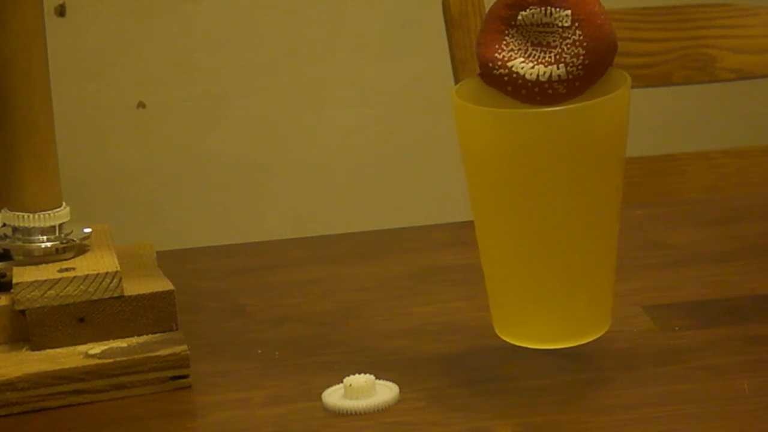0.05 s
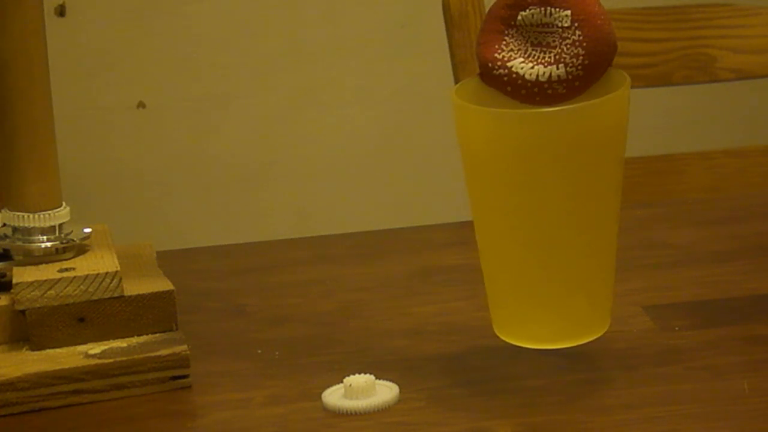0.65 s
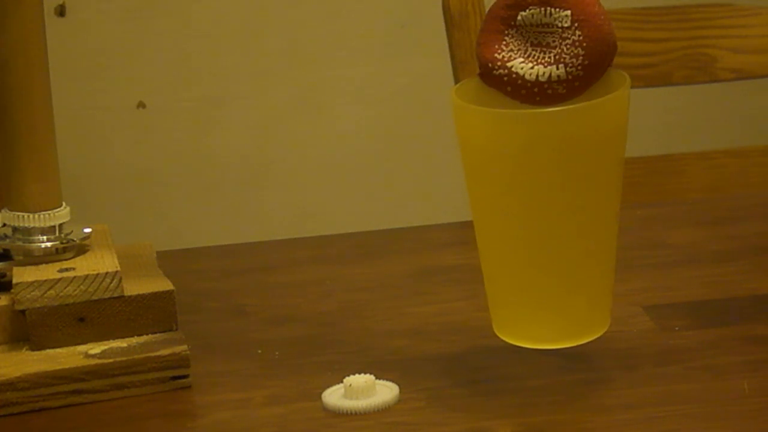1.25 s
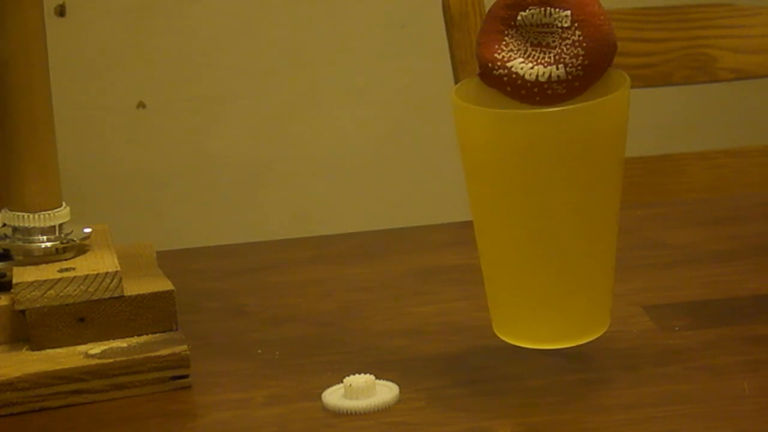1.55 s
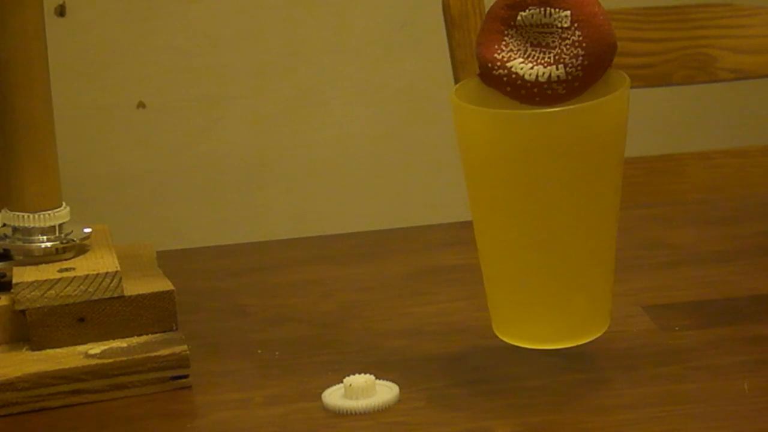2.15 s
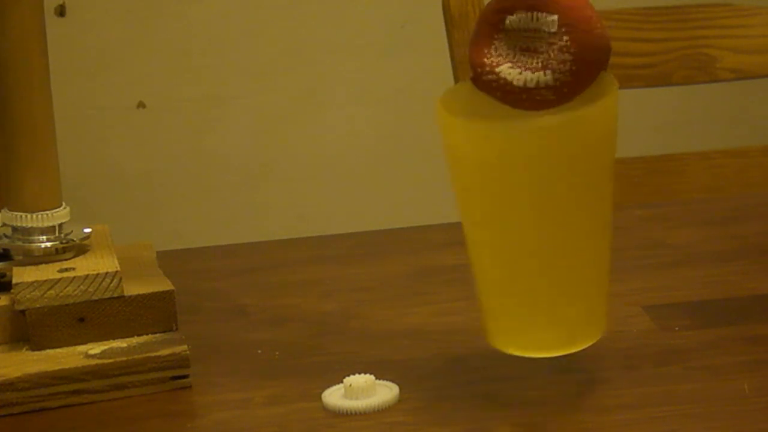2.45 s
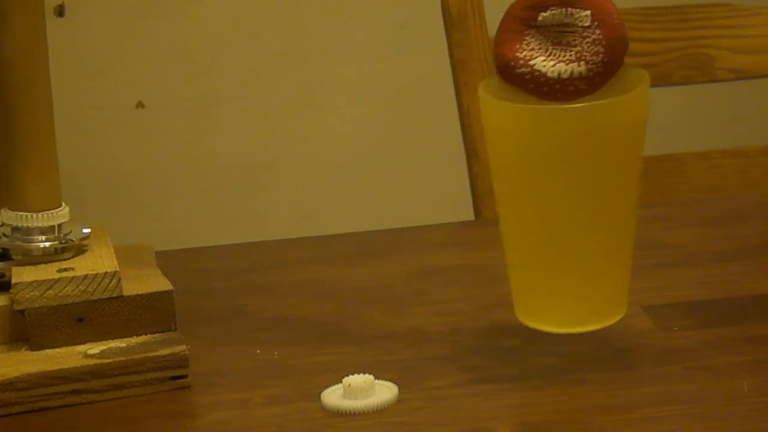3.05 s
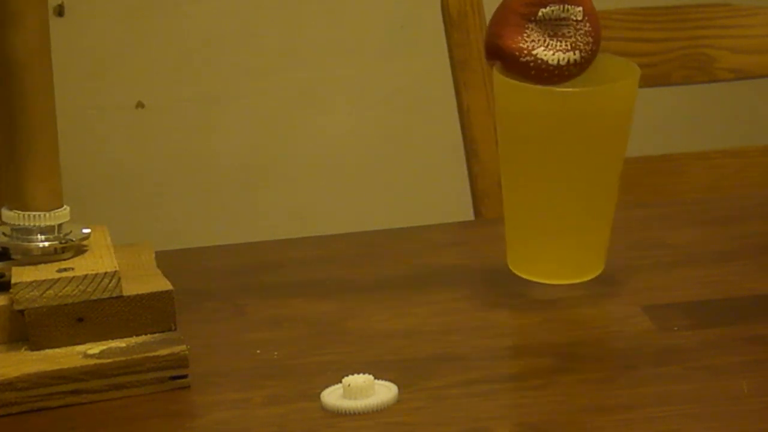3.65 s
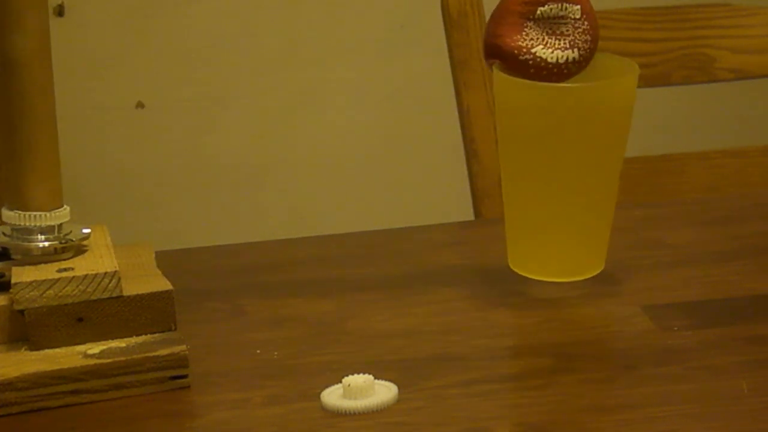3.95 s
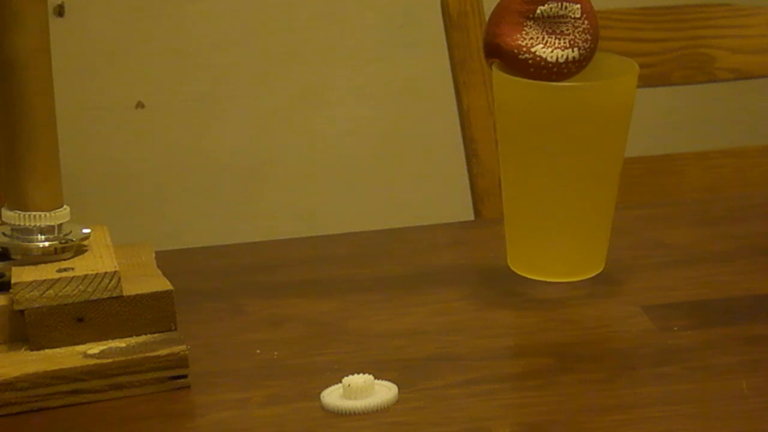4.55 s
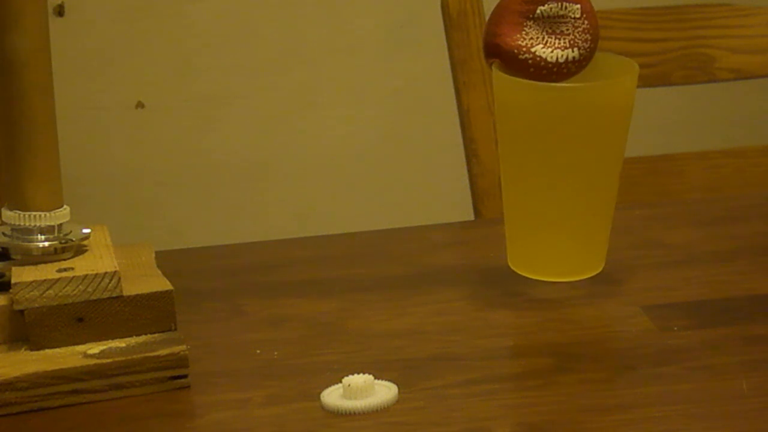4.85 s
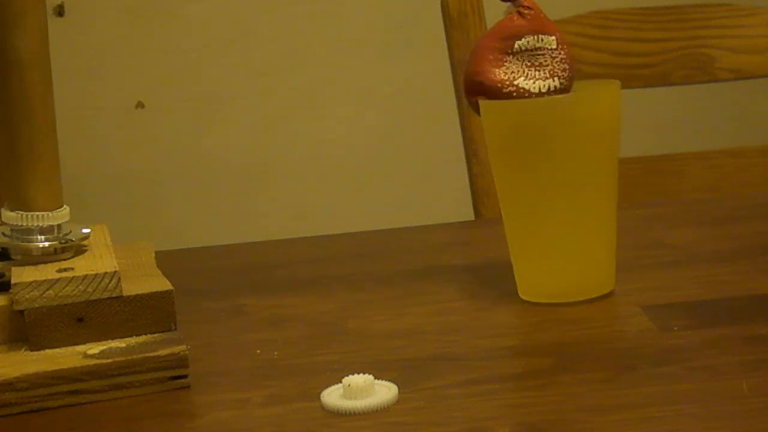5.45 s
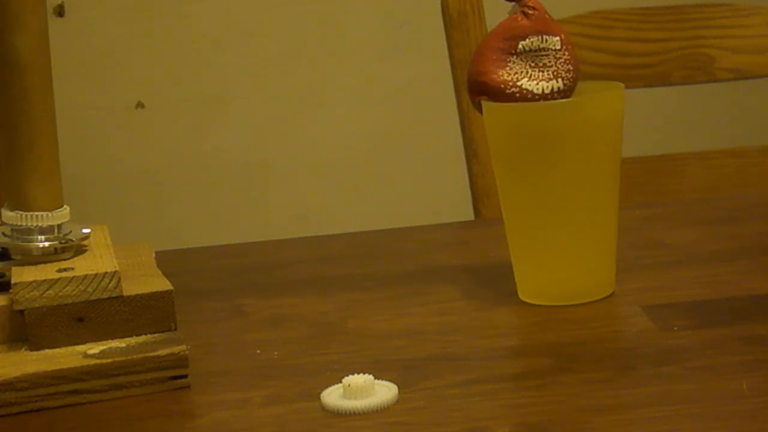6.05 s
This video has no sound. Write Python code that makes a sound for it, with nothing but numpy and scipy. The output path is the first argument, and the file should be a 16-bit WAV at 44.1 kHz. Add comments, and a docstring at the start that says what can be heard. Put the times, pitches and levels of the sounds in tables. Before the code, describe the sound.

A burst of clacking gears opens, followed by scattered small clicks from a mechanical arm. Little servo motors whir twice with a buzzing whine, then twitch and rasp briefly. The arm rattles again and sets a cup down on a wooden table with one hard knock, the loudest sound, slightly distorting the microphone. A few faint ticks follow over the quiet air and hum of a small room.

```python
"""In a small room, a home-made robot arm carries a cup over a wooden table.
Its little servo motors twitch, whine through two short moves and rasp through two shorter ones.
Twice the arm shudders, so that its loose gears and links rattle and its wooden frame rings.
At last the cup is knocked down on the table, which overloads the microphone and briefly turns
the sound down. Soft room air and a faint hum lie underneath."""
import sys
import numpy as np
from scipy import signal
from scipy.fft import rfft, irfft
from scipy.io import wavfile

SR = 44100
rng = np.random.default_rng(int(sys.argv[2]) if len(sys.argv) > 2 else 0)


def store_pcm(level_fs):
    """Save levels as 16-bit WAV."""
    pcm = np.round(np.clip(level_fs, -1, 1) * 32767).astype(np.int16)
    wavfile.write(sys.argv[1], SR, np.atleast_2d(pcm).T)


N = 278271


def rattle():
    """The arm shudders: gears slam and grind one way, loose links click back, and the frame rings."""
    # Each row: start in seconds, slam level in dB, grind level in dB, grind fade time in seconds.
    slams = [(0, -27, -23.5, 0.02), (.0434, -13.5, -12.5, .01), (.1284, -14.5, -15, 0.013),
             (.2174, -12.5, -15.5, .015), (.3123, -13.5, -14.5, 0.012), (0.4191, -15, -17.5, 0.0087),
             (4.638, -14.5, -13, .05), (4.7058, -12, -13.5, .018), (4.766, -13.5, -13.5, .02),
             (4.8429, -22.5, -29, .007)]
    # Three loose links close in turn. Each row: start in seconds, gap between links in seconds,
    # then levels in dB for the first, second and third link and for the frame's thump.
    rebounds = [(.0052, 0.0084, -18.5, -16.5, -18, -24), (.088, .0091, -15, -17.5, -19, -22),
                (.1763, .0094, -16, -16, -17.5, -19), (.2696, 0.0096, -19.5, -17, -16, -15.5),
                (.3751, 0.0099, -23, -16, -18, -19), (4.589, .012, -22.5, -18, -15, -22),
                (4.6727, .0055, -19.5, -18.5, -17, -27), (4.736, .005, -16, -19, -16.5, -25),
                (4.791, 0.01, -31, -19.5, -18.5, -27.5)]
    # The three links. Each row: fade time in seconds, brightness in dB per octave.
    links = [(.0042, -2), (.0027, 0), (.002, 4.6)]
    # The wooden frame's tones. Each row: pitch in Hz, relative level in dB, seconds to fade by 60 dB.
    frame_tones = [(786.5, -34, 0.057), (843, -33.5, 0.052), (1230, -47, 0.023), (1840, -36.5, 0.02),
                   (3620, -41, .02)]
    out = np.zeros(N)
    for start, slam_db, grind_db, decay_s in slams:
        add(out, start, amp(slam_db) * clack(decay_s=.0042, tilt_db=0))
        add(out, start + .0055, amp(grind_db) * clack(decay_s, tilt_db=-.5))
    for start, gap, *link_db, thump_db in rebounds:
        for k, (decay_s, tilt_db) in enumerate(links):
            add(out, start + k * gap, amp(link_db[k]) * clack(decay_s, tilt_db))
        thump_s = start + 2 * gap - .003  # the frame gives just before the last link closes
        add(out, thump_s, amp(thump_db) * clack(decay_s=.0045, tilt_db=-6))
    return out + amp(-9) * signal.fftconvolve(out, ring(frame_tones))[:N]


def clack(decay_s, tilt_db, softening_s=.0077):
    """Two parts of the arm hit each other. Longer grinding is made of softer, duller hits."""
    # The tone colour of the links. Each row: frequency in Hz, relative level in dB.
    link_colour = [(60, -57), (150, -38.5), (330, -17), (640, -14), (800, -1.5), (1600, -4.5), (1900, -2.5),
                   (2840, -7), (3500, -5.5), (4400, -11), (6500, -15.5), (9300, -17.5), (12500, -24),
                   (16000, -35.5)]
    sound = signal.fftconvolve(chatter(decay_s, first=.31), impact(link_colour, tilt_db))
    cutoff_hz = .4 * SR / (1 + decay_s / softening_s)
    return blow(signal.lfilter(*signal.butter(1, cutoff_hz, fs=SR), sound))


def servos(slack_s=.064, coast_s=.05, hiss_rise_db_per_s=226, load_rise_db_per_s=900, fade_db_per_s=720):
    """Gear teeth whine as they meet. Gear hiss and the fizz of brush sparks pulse with each motor turn."""
    # Each row: start and brake times in seconds, top tooth rate in Hz, seconds to speed up, slowing in
    # Hz per second, then relative dB for the starting scrape, hiss, whine, fizz and extra braking hiss.
    moves = [(2.377, 2.857, 1483, .27, 376, -39, -42.5, -39.5, -33.5, 22),
             (2.96, 3.15, 1253, .07, 0, -53, -37, -36.5, -29.5, 13),
             (4.243, 4.306, 1110, .06, 0, -51, -37, -62, -40, -4),
             (5.008, 5.082, 1350, .06, 0, -40, -41, -68, -38.5, -6)]
    # The whine's tones. Each row: multiple of the tooth rate, relative level in dB.
    harmonics = [(1, 3), (2, 2), (3, -13), (4, -4.5), (6, -15)]
    # The load on the teeth changes for a moment.
    # Each row: middle in seconds, half length in seconds, extra whine in dB, extra hiss in dB.
    bites = [(2.42, 0.037, -1, 4), (2.504, 0.012, 0, 15.5), (2.558, .024, 12.5, -3), (2.63, .018, -8, -4),
             (2.784, .035, 8.5, -2), (3.072, .012, 12.5, 0), (3.118, 0.0097, 12.5, 0)]
    # Three tone colours. Each row: frequency in Hz, relative level in dB.
    case_colour = [(50, -40), (160, -20), (300, -25), (1230, -29.5), (1480, -19), (1700, -23.5), (2500, -1),
                   (3150, -8), (3750, 4.5), (4200, -6), (4900, -.5), (5600, -8), (9000, -18)]  # the servo's case and the link it is bolted to
    brush_colour = [(1700, -12.5), (2900, 5.5), (5000, -2), (6800, 2), (8900, 5), (10400, -.5), (11700, 3),
                    (13000, -1), (16000, -18)]  # sparks at the motor's sliding contacts
    scrape_colour = [(2000, -26), (3500, -6), (4200, -4), (4800, 1), (5700, -4), (7000, -13), (10000, -19),
                     (15000, -22)]  # the motor breaking loose
    gears, brushes, scrape = noise(case_colour), noise(brush_colour), noise(scrape_colour)
    flutter, grit, waver = wander(158), wander(180), wander(35)
    out = np.zeros(N)
    for start, brake, top_hz, spin_up, sag, scrape_db, hiss_db, whine_db, fizz_db, brake_db in moves:
        at = np.arange(round(start * SR), round((brake + coast_s) * SR))
        t = at / SR
        loaded_s = t - start - slack_s  # the gears take the load once their slack is used up
        slack_left_s = np.maximum(-loaded_s, 0)
        coasting_s = np.maximum(t - brake, 0)
        tooth_hz = tooth_rate(loaded_s, coasting_s, top_hz, spin_up, sag)
        teeth = np.cumsum(tooth_hz * (1 + .012 * flutter[at])) / SR
        shaft = np.cos(2 * np.pi * teeth / 10)  # a ten-tooth gear, slightly off centre
        whine = sum(amp(db + read(case_colour, k * tooth_hz)) * np.sin(2 * np.pi * k * teeth)
                    for k, db in harmonics)
        whine = evened(whine * (1 + .36 * shaft) * amp(2.8 * waver[at]))
        pulsing = evened(amp(.54 * shaft + 1.5 * grit[at] + 1.2 * waver[at]))
        bite_whine_db, bite_hiss_db = sum(np.outer(extra, swell(t, s, half)) for s, half, *extra in bites)
        rasp_db = brake_db * swell(t, brake, half_s=.009)
        hiss = gears[at] * amp(hiss_db + bite_hiss_db + rasp_db - hiss_rise_db_per_s * slack_left_s)
        hiss += scrape[at] * amp(scrape_db) * swell(t, start + .042, half_s=.033)
        driven = amp(whine_db + bite_whine_db) * whine + amp(fizz_db) * pulsing * brushes[at]
        driven *= amp(-load_rise_db_per_s * slack_left_s)  # whine and fizz come in with the load
        add(out, start, (pulsing * hiss + driven) * amp(-fade_db_per_s * coasting_s))
    return amp(-2.5) * out


def tooth_rate(loaded_s, coasting_s, top_hz, spin_up_s, sag_hz_per_s, coast_hz_per_s=1500):
    """Teeth meeting per second: the motor speeds up, sags under load and runs down after braking."""
    to_go = np.clip(1 - loaded_s / spin_up_s, 0, 1.5)
    rising_hz = top_hz * (1 - .23 * to_go ** 2)  # 77% of top speed as the gears take the load
    return rising_hz - sag_hz_per_s * np.maximum(loaded_s - spin_up_s, 0) - coast_hz_per_s * coasting_s


def cup_knock(start_s=5.0842, travel_s=.0028, size=16384):
    """The cup lands and rings. The table top bends in waves that carry high notes faster than low ones."""
    # The table's tone colour. Each row: frequency in Hz, relative level in dB.
    table_colour = [(100, -39), (300, -19.5), (480, -10), (620, -7.5), (810, 9), (1050, -2.5), (1400, -2),
                    (2100, -15.5), (4400, -30), (5300, -24.5), (6400, -39.5), (12000, -47.5)]
    # The cup's tones. Each row: pitch in Hz, relative level in dB, seconds to fade by 60 dB.
    cup_tones = [(808, -19, 0.24), (880, -21, 0.22), (885, -26, 0.18), (476, -19.5, 0.22)]
    hz = np.fft.rfftfreq(size, 1 / SR)
    spreading = np.exp(-4j * np.pi * travel_s * np.sqrt(1000 * hz))  # travel_s is the delay at 1 kHz
    thud = irfft(rfft(impact(table_colour), size) * spreading)
    out = np.zeros(N)
    add(out, start_s, blow(thud))
    add(out, start_s + travel_s, ring(cup_tones))
    return amp(3) * out


def twitches():
    """A servo nudges its gears to hold still. Each nudge raps the gearbox and snaps the teeth."""
    # Each row: start in seconds, rap level in dB, snap level in dB, rap fade time in seconds.
    nudges = [(.5792, -40, -40, .003), (0.7492, -41, -44.5, .004), (1.033, -45.5, -52, .004),
              (1.3473, -38.5, -59, 0.0029), (1.8257, -48, -68, .004), (2.061, -32, -32.5, 0.0035),
              (2.2934, -38.5, -49, 0.0046), (2.306, -38.5, -34.5, 0.0098), (2.84, -45.5, -70, .004),
              (3.797, -43, -56, 0.0046), (3.815, -43, -43.5, 0.019), (3.836, -42.5, -46, .014),
              (4.243, -29, -32, 0.0036), (4.579, -40, -58, 0.006), (5.6854, -56, -47.5, .002),
              (6.2502, -58, -51, .004), (6.2784, -66, -47, 0.0032)]
    # Tone colours of the gearbox and the teeth. Each row: frequency in Hz, relative level in dB.
    gearbox_colour = [(100, -38), (600, -13.5), (1000, -9), (1250, 5), (1550, -3), (2100, -16),
                      (3500, -30.5)]
    snap_colour = [(80, -38), (1000, 2.5), (2500, 0), (6500, -5), (10000, -12), (12000, -2.5), (13500, -10),
                   (16000, -6)]
    out = np.zeros(N)
    for start, rap_db, snap_db, decay_s in nudges:
        rap_colour = np.array(gearbox_colour) * [1 + .035 * rng.standard_normal(), 1]  # pitch varies
        for when, db in ((start - .003, -10), (start, 0)):  # a light touch, then the nudge
            rap = signal.fftconvolve(chatter(decay_s, first=.35), impact(rap_colour))
            snap = signal.fftconvolve(chatter(.66 * decay_s, first=.26), impact(snap_colour))
            add(out, when, amp(rap_db + db) * blow(rap))
            add(out, when, amp(snap_db + db) * blow(snap))
    return out


def jolts():
    """The arm gives its wooden base a dull bump as it settles or sets off."""
    # Each row: start in seconds, level in dB, fade time in seconds.
    bumps = [(0.5293, -27.5, 0.002), (2.435, -31, 0.018), (2.508, -30, 0.02)]
    # The base's tone colour. Each row: frequency in Hz, relative level in dB.
    base_colour = [(90, -30), (280, -5.5), (480, 2), (800, -3), (1300, -5), (2100, -11), (3500, -22),
                   (12000, -29.5)]
    out = np.zeros(N)
    for start, db, decay_s in bumps:
        bump = signal.fftconvolve(chatter(decay_s, first=.24), impact(base_colour))
        add(out, start, amp(db) * blow(bump))
    return out


def room(x, echo_db, gap_s=.0046):
    """The walls follow a sound with a dense tail of echoes, whose highest notes die first."""
    # Each row: frequency in Hz, seconds for the echoes to fade by 60 dB.
    fade_times = [(150, 0.4), (800, 0.29), (2500, 0.3), (6000, 0.28), (12000, 0.17)]
    t = np.arange(SR * 3 // 4) / SR
    echoes = rng.choice([-1., 1.], len(t)) * (rng.random(len(t)) < .1) * (t > gap_s)
    hz, age_s, bands = signal.stft(echoes, SR, nperseg=256)
    fade = amp(-60 * age_s / read(fade_times, hz)[:, None])
    tail = signal.istft(bands * fade, SR, nperseg=256)[1]
    return x + amp(echo_db) * signal.fftconvolve(x, tail / np.linalg.norm(tail))[:N]


def background():
    """Room air and a faint wavering hum."""
    # The air's tone colour. Each row: frequency in Hz, relative level in dB.
    air_colour = [(25, -54), (100, -14.5), (200, -5), (340, -1), (480, 2), (700, 0), (1100, -1.5),
                  (2200, -8.5), (9000, -20)]
    # Each row: pitch in Hz, level in dB.
    hum_tones = [(353, -65.5), (465, -65), (1380, -71), (1463, -83), (2342, -70)]
    t = np.arange(N) / SR
    hum = sum(amp(db) * np.sqrt(2) * np.sin(2 * np.pi * hz * t + .99 * wander(2.83))
              for hz, db in hum_tones)
    return amp(-52.5) * noise(air_colour) * amp(.5 * wander(3.6)) + hum


def impact(colour, tilt_db=0, size=2048):
    """The click of a struck part with this tone colour, brightened by tilt_db per octave."""
    hz = abs(np.fft.fftfreq(size, 1 / SR))
    octaves = np.log2(np.clip(hz, 300, 8000) / 2000)
    log_gain = np.log(amp(read(colour, hz) + tilt_db * octaves))
    click = np.fft.ifft(np.exp(signal.hilbert(log_gain).conj())).real  # starts sharply, then dies away
    return click / np.linalg.norm(click)


def ring(tones):
    """The fading tones of a struck part. Every second one starts by swinging the other way."""
    t = np.arange(SR // 2) / SR
    return sum((-1) ** k * amp(db - 60 * t / fade_s) * np.sin(2 * np.pi * hz * t)
               for k, (hz, db, fade_s) in enumerate(tones))


def chatter(decay_s, first, size=4096):
    """One firm hit, whose strength is set by first, then a fading shower of tiny bounces."""
    t = np.arange(size) / SR
    hits = rng.standard_normal(size) * (rng.random(size) < .3) * np.exp(-t / decay_s)
    hits /= np.linalg.norm(hits)
    hits[0] += first
    return hits / np.linalg.norm(hits)


def noise(colour):
    """Steady noise with this tone colour."""
    gain = amp(read(colour, np.fft.rfftfreq(N, 1 / SR)))
    return evened(irfft(rfft(rng.standard_normal(N)) * gain, N))


def wander(rate_hz):
    """A random drift of about size 1, mostly slower than rate_hz."""
    return noise([(rate_hz, 0), (rate_hz * 4, -100)])


def swell(t, middle_s, half_s):
    """A smooth bump of height 1."""
    return np.exp(-((t - middle_s) / half_s) ** 2)


def amp(db):
    """Turns decibels into a number to multiply by."""
    return 10 ** (np.asarray(db) / 20)


def evened(x):
    """Scales a sound to an average power of 1."""
    return x / np.sqrt(np.mean(x ** 2) + 1e-20)


def blow(x):
    """Scales a short sound to the energy of 10 ms at full level."""
    return x * np.sqrt(SR / 100 / np.sum(x ** 2))


def read(table, hz):
    """Looks up a frequency in a table, sliding between its rows."""
    row_hz, values = np.transpose(table)
    return np.interp(np.log(hz + 1), np.log(row_hz), values)


def add(mix, start_s, sound):
    """Mixes a sound in at the given time."""
    part = mix[max(round(start_s * SR), 0):][:len(sound)]
    part += sound[:len(part)]


def scene():
    """The arm and the cup echo in the room, over the background, in one channel."""
    arm = room(rattle() + jolts(), echo_db=-6.5)
    arm += room(twitches(), echo_db=-6)
    arm += room(servos(), echo_db=-4.5)
    cup = room(cup_knock(), echo_db=-3.5, gap_s=.009)
    return (arm + cup + background())[None]


def record(dry, bass_cut_hz=100, limit_db=-4, recovery_db_per_s=130, attack_s=.0016, ceiling=.6):
    """The microphone turns loud sounds down, but too slowly for the knock, whose start overloads it."""
    x = signal.lfilter(*signal.butter(2, bass_cut_hz, "high", fs=SR), dry[0])
    over_db = np.maximum(20 * np.log10(abs(x) + 1e-9) - limit_db, 0)
    recovery_db = recovery_db_per_s * np.arange(N) / SR  # the returning volume holds up the knock's echo
    held_db = np.maximum.accumulate(over_db + recovery_db) - recovery_db
    lag = np.exp(-1 / (attack_s * SR))
    x = x / amp(signal.lfilter([1 - lag], [1, -lag], held_db))
    x = x / (1 + (x / ceiling) ** 12) ** (1 / 12)  # overload flattens the peaks
    amplifier_hiss = signal.lfilter(*signal.butter(1, 150, "high", fs=SR), rng.standard_normal(N))
    x = x + amp(-60) * amplifier_hiss
    notch_hz, treble_cut_hz = 7900, 16100
    for width_hz in (900, 500):  # cut out one narrow band of treble
        x = signal.lfilter(*signal.iirnotch(notch_hz, notch_hz / width_hz, SR), x)
    treble_cut = signal.firwin(511, treble_cut_hz, window=("kaiser", 9), fs=SR)
    return signal.oaconvolve(x, treble_cut, "same")[None]


dry = scene()
out = record(dry)
store_pcm(out)
```